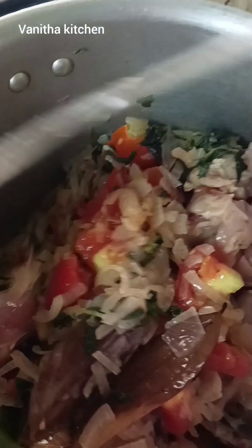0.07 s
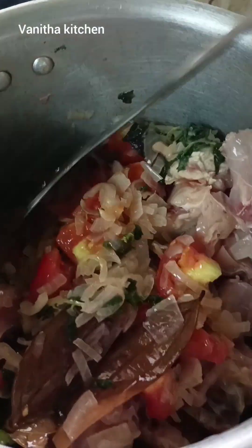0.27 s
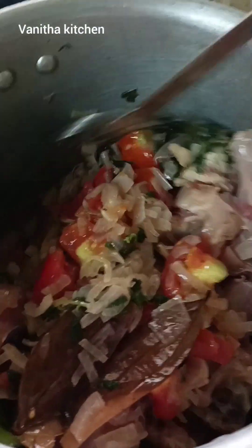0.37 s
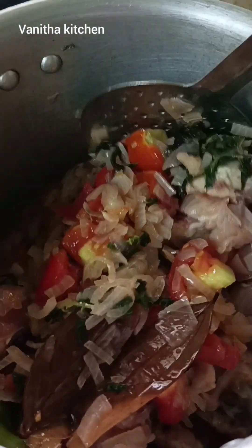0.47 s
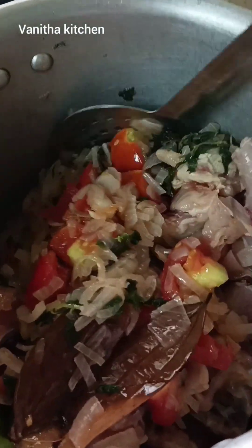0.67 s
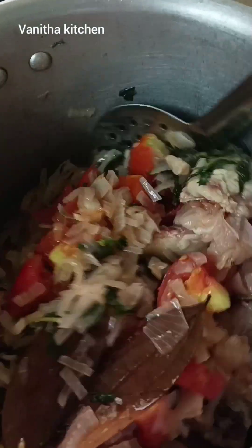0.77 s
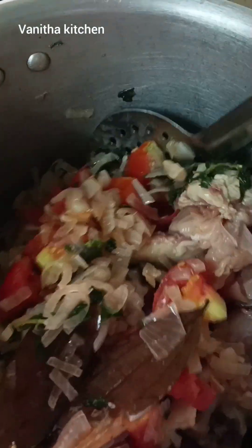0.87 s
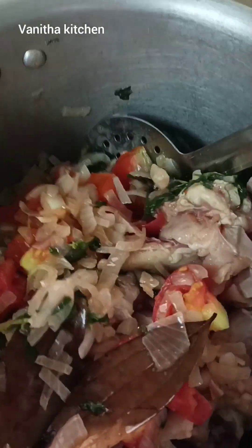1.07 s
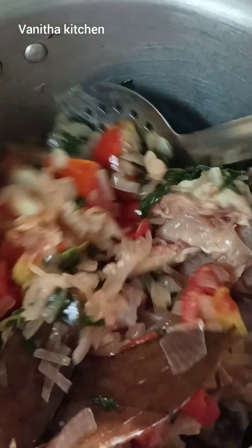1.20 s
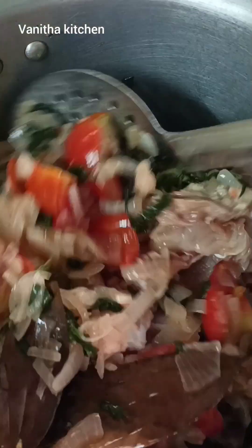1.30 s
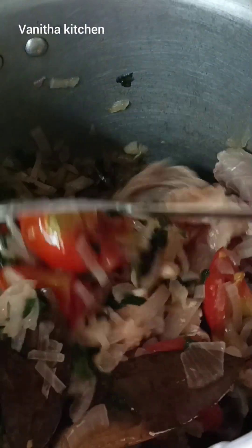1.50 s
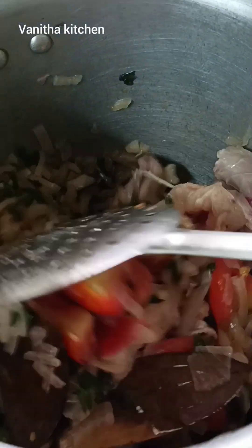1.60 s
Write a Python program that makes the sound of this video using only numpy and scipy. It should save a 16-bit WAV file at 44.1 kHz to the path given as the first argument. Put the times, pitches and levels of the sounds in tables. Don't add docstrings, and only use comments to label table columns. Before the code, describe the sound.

After a brief quiet moment, bright spoon knocks ring on a cooking pot, followed by gritty scrapes down the wall, a lull, and softer muffled rubbing along the base, heard close in stereo over low kitchen noise.

```python
import sys
import numpy as np
from scipy import signal
from scipy.fft import rfft, irfft
from scipy.io import wavfile
from scipy.ndimage import uniform_filter1d

SR = 44100
rng = np.random.default_rng(int(sys.argv[2]) if len(sys.argv) > 2 else 0)


def wrap_up_sound(samples):
    columns = np.atleast_2d(samples).T
    tamed = np.clip(columns, -1, 1)
    steps = np.round(tamed * 32767).astype(np.int16)
    wavfile.write(sys.argv[1], SR, steps)


def linear_from_db(decibels):
    return 10 ** (np.asarray(decibels, float) / 20)


N = 72765
LAG_S = 0.0008


def evened(x):
    return x / np.sqrt(np.mean(x ** 2) + 1e-20)


def read(points, hz):
    f, value = np.transpose(points)
    return np.interp(np.log(hz + 1), np.log(f + 1), value)


def colour(x, points, share):
    hz = np.fft.rfftfreq(len(x), 1 / SR)
    return irfft(rfft(x) * linear_from_db(share * read(points, hz)), len(x))


def resonate(x, hz, width):
    turn = np.exp(2j * np.pi * np.cumsum(hz * np.ones(x.shape[-1])) / SR)
    decay = np.exp(-np.pi * width / SR)
    return 2 * (turn * signal.lfilter([1 - decay], [1, -decay], x / turn)).real


# frequency in Hz, level in dB per Hz.
HISS = [(55, -25), (130, -2.5), (440, -8.5), (800, -14.5), (3000, -22), (12000, -28.5), (15700, -29),
        (16100, -58)]
# frequency in Hz, correlation (1 = same).
HISS_ALIKE = [(60, 1), (600, 0.09), (3000, 0.067), (15000, 0.13)]
# frequency in Hz, left minus right in dB.
HISS_SIDES = [(60, -3), (180, 3), (550, 6.5), (1650, 11.5), (4970, 1), (15000, -3.5)]


def kitchen_hiss():
    level_db, patch_db = -51.5, -1.5
    hz = np.fft.rfftfreq(1024, 1 / SR)
    a, b, c, d, patches = rng.standard_normal((N // 256 + 5, len(hz), 5)).T
    patches = uniform_filter1d(patches, size=10, axis=0)
    patches = evened(uniform_filter1d(patches, size=10, axis=1))
    alike = read(HISS_ALIKE, hz)[:, None]
    side = linear_from_db(read(HISS_SIDES, hz) / 2)[:, None]
    left = a + 1j * b
    right = alike * left + np.sqrt(1 - alike ** 2) * (c + 1j * d)
    spectrum = np.array([side * left, right / side])
    spectrum *= linear_from_db(read(HISS, hz)[:, None] + patch_db * patches)
    hiss = signal.istft(spectrum, nperseg=1024, noverlap=768)[1][:, :N]
    return linear_from_db(level_db) * evened(hiss)


# frequency in Hz, level in dB.
TONES = [(441.4, -63), (589, -70), (2013, -73), (6681, -82), (8554, -82), (10616, -86), (14858, -79),
         (15057, -75)]
# time in seconds, level in dB.
HUM = [(0, -65), (.25, -63), (.32, -113), (1.25, -65), (1.38, -59.5), (1.65, -59)]


def appliances():
    hum_hz, whine_hz, whine_width_hz, whine_db = 69.7, 15000, 400, -73
    t = np.arange(N) / SR
    tones = np.zeros(N)
    for hz, db in TONES:
        waver = 1 + 0.32 * evened(uniform_filter1d(rng.standard_normal(N), size=2000))
        tones += np.sqrt(2) * linear_from_db(db + 2) * waver * np.sin(2 * np.pi * (hz * t + rng.random()))
    hum = np.sqrt(2) * linear_from_db(np.interp(t, *np.transpose(HUM))) * np.sin(2 * np.pi * hum_hz * t)
    whine = resonate(rng.standard_normal((2, N)), whine_hz, whine_width_hz)
    whine = resonate(whine, whine_hz, whine_width_hz)
    return tones + hum * linear_from_db([[1.5], [-1.5]]) + linear_from_db(whine_db) * evened(whine)


def room(x):
    level_db, t60_s = -17, 0.15
    t = np.arange(SR // 2) / SR
    tail = rng.standard_normal((2, len(t))) * linear_from_db(-60 * t / t60_s) * (t > 0.005)
    tail /= np.linalg.norm(tail[0])
    return linear_from_db(level_db) * signal.fftconvolve(x, tail, axes=1)[:, :N]


# frequency in Hz, left minus right in dB.
POT_SIDES = [(100, 2), (350, -2), (650, 3), (1300, 7), (2500, 3), (5000, 4), (9000, 8), (15000, 4)]


def ports(a, b):
    alike, pad = 0.13, np.zeros(256)
    right = alike * a + np.sqrt(1 - alike * alike) * b
    sides = [colour(np.r_[pad, a], POT_SIDES, 0.5), colour(np.r_[pad, right], POT_SIDES, -0.5)]
    return np.array(sides)[:, len(pad):] / np.sqrt(len(a))


def ring(modes, bed, bed_db, t60):
    damping = 0.0061
    port_turn, port_spread = 0.2, 0.14
    t = np.arange(8192) / SR
    hz, width, db = np.transpose(modes)[:, :, None]
    width = width + damping * hz
    first, spread = rng.random((2, len(modes), 1))
    second = first + port_turn + port_spread * spread - hz * LAG_S
    waves = np.sin(2 * np.pi * (hz * t + np.array([first, second])))
    clear = (linear_from_db(db) * width * np.exp(-np.pi * width * t) * waves).sum(axis=1)
    dense = np.array([colour(noise, bed, 0.82) for noise in rng.standard_normal((2, len(t)))])
    dense *= linear_from_db(-60 * t / t60)
    return ports(*(evened(clear) + linear_from_db(bed_db) * evened(dense)))


def crack(bed):
    level_db, tilt_db_per_octave, port_shift_s, size = 5.5, 6, 0.0006, 8192
    hz = np.fft.rfftfreq(size, 1 / SR)
    tilt = tilt_db_per_octave * np.log2(1 + hz / 1000)
    cepstrum = irfft(np.log(linear_from_db(read(bed, hz) + tilt)))
    fold = np.r_[1, 2 * np.ones(size // 2 - 1), 1, np.zeros(size // 2 - 1)]
    click = evened(irfft(np.exp(rfft(cepstrum * fold))))
    return linear_from_db(level_db) * ports(click, np.roll(click, round(port_shift_s * SR)))


# start in seconds, length in seconds, first pressure in dB,
# last pressure in dB, extra weight on low modes in dB.
STROKES = [(0.202, 0.048, -25.5, -34.5, 4.5), (0.243, 0.065, -46.5, -57.5, 14),
           (0.319, 0.022, -34, -29.5, 13.5), (0.337, 0.019, -31.5, -28.5, 10), (0.365, 0.053, -39, -42, 9),
           (0.427, 0.04, -25, -33, 3), (0.474, 0.0284, -40, -41.5, 12.5), (0.52, 0.092, -53, -46, -37),
           (0.635, 0.067, -31.5, -54.5, 6), (0.704, 0.064, -58, -54, 9.5), (0.754, 0.035, -43.5, -37.5, 2),
           (0.795, 0.041, -36, -41.5, 6), (0.838, 0.032, -65, -62, 14), (0.904, 0.029, -54, -66, 0),
           (1.004, 0.045, -60.5, -64.5, 14.5), (1.166, 0.032, -40, -40.5, 3.5),
           (1.199, 0.055, -41.5, -30.5, 10), (1.261, 0.033, -35.5, -30, 10),
           (1.292, 0.057, -40.5, -62, 14.5), (1.36, 0.041, -37, -47.5, 17.5), (1.4, 0.02, -55, -52.5, 13)]


def scrape():
    slips_per_s, spread_db, split_hz, edge_s = 9000, 2.5, 1070, 0.0019
    t = np.arange(N) / SR
    size = linear_from_db(spread_db * np.minimum(rng.exponential(1, N), 4))
    slips = rng.random(N) < slips_per_s / SR
    grit = evened(size * slips * rng.standard_normal(N))
    low = signal.sosfilt(signal.butter(2, split_hz, fs=SR, output="sos"), grit)
    high = signal.sosfilt(signal.butter(2, split_hz, "high", fs=SR, output="sos"), grit)
    out = np.zeros(N)
    for start, length, first_db, last_db, low_db in STROKES:
        end = start + length
        touch = np.clip(np.minimum(t - start, end - t) / edge_s + 0.5, 0, 1)
        pressure = linear_from_db(np.interp(t, [start, end], [first_db, last_db]))
        out += touch * pressure * (high + linear_from_db(low_db) * low)
    return out


# time in seconds, frequency in Hz.
SQUEAK = [(.75, 1080), (.85, 989.6), (.98, 880), (1.05, 897)]


def squeak(slips, zone):
    level_db, width_hz = 27, 30
    pitch = np.interp(np.arange(N) / SR, *np.transpose(SQUEAK))
    tone = resonate(slips * ((zone == 4) | (zone == 5)), pitch, width_hz)
    return linear_from_db(level_db) * tone * linear_from_db([[4], [-4]])


# time in seconds, peak in dB, colour centre in Hz, colour level in dB,
# push on the ring in dB.
KNOCKS = [(0.198, -14, 2590, -8, 6), (0.1995, -13.5, 3400, 0.5, 10), (0.2068, -24.5, 1600, 21.5, 0.5),
          (0.2178, -20.5, 5100, -0.5, 8.5), (0.3132, -11, 10400, 19, 3), (0.3155, -15, 3600, 6, 1.5),
          (0.3188, -27, 10400, 28.5, 4.5), (0.3203, -9.5, 5500, -23, 5.5), (0.3248, -19, 3480, -4, 6.5),
          (0.3856, -39, 2030, 21, 9), (0.4303, -22.5, 3760, 1.5, 12.5), (0.444, -37, 4630, 8, 19),
          (0.464, -39, 2080, 21, 12), (0.5389, -50.5, 4460, 20.5, 10.5), (0.552, -46.5, 2920, 17, 16),
          (0.6368, -19, 4420, -32, 6.5), (0.8912, -17.5, 3370, -8.5, 11), (1.167, -49, 4400, 16, -12),
          (1.1799, -50, 3250, 3, -1), (1.221, -47, 800, 21, 4), (1.2462, -26, 900, -10, -2),
          (1.268, -33, 3150, 15, 7.5), (1.2800, -24, 1670, 3, 8), (1.358, -39.5, 3400, 2, 12),
          (1.371, -39, 600, 18, 11), ]


def knocks():
    onset_s, chatter_s, chatter_db, contact_db = 0.003, 0.002, -3, 7
    t = np.arange(1024) / SR
    out = np.zeros((2, N))
    envelope = np.minimum(t / onset_s, 1) ** 4 * np.exp(-np.maximum(t - onset_s, 0) / chatter_s)
    chatter = linear_from_db(chatter_db) * envelope * rng.standard_normal((30, len(t)))
    for (s, db, hz, colour_db, ring_db), burst in zip(KNOCKS, chatter):
        burst[round(onset_s * SR)] += linear_from_db(contact_db)
        width = 0.25 * hz
        tint = resonate(resonate(burst, hz, width), hz, width)
        burst = burst + linear_from_db(colour_db) * tint
        at = round((s - onset_s + 0.001) * SR)
        out[:, at:at + len(t)] += linear_from_db(db - 8.5) * burst * linear_from_db([[ring_db], [0]])
    return out


# frequency in Hz, width in Hz, level in dB.
RIM = [(390.5, 33, 1.5), (645, 9.9, 1), (1035, 60, -4.5), (1220, 74, 3.5), (1611, 29, 6), (2010, 190, 1.5),
       (2320, 100, -5), (2490, 39, -12), (3450, 73, -4.5), (3630, 50, -9), (4720, 110, -6),
       (6870, 660, -13)]
# frequency in Hz, width in Hz, level in dB.
WALL = [(386.7, 19, 3.5), (1300, 50, -0.5), (1870, 12, 7), (2076, 58, 5), (2240, 24, 4.5), (2510, 45, 3),
        (2955, 53, 2.5), (3280, 62, 4.5), (3610, 49, 0), (3785, 55, 2), (4654, 69, 2), (5500, 260, -0.5),
        (6430, 95, -1.5), (10400, 140, -17.5)]
# frequency in Hz, width in Hz, level in dB.
SLOPE = [(394, 22, -12), (710, 34, -38), (1279, 30, -0.5), (1973, 34, 5.5), (1986, 35, -6.5),
         (2232, 40, -5), (3160, 130, -9), (3400, 67, -32), (3720, 42, -4), (4260, 140, -15),
         (4620, 88, -10.5), (5600, 190, -15), (6700, 71, -25)]
# frequency in Hz, width in Hz, level in dB.
LOWER = [(381, 32, -7), (1074, 17, -8), (1360, 20, -3), (1930, 34, 1.5), (2214, 26, -5.5), (3008, 52, -1),
         (3340, 57, -7.5), (4340, 24, -10), (5440, 68, -6.5), (6540, 100, -15.5)]
# frequency in Hz, width in Hz, level in dB.
DEEP = [(419, 17, -13.5), (2190, 170, -6.5), (3060, 100, -11), (3330, 48, -6), (3580, 51, -2.5),
        (3560, 77, -1), (4350, 270, -16), (4600, 75, -11), (5650, 68, -17), (6070, 91, -21)]
# frequency in Hz, width in Hz, level in dB.
CORNER = [(670, 24, -6), (930, 74, -7), (1310, 23, 2.5), (2350, 73, -7), (2840, 60, 3), (3020, 160, 4.5),
          (3375, 160, 0), (3680, 36, -31), (4560, 140, -6), (5710, 170, 0), (7100, 310, -39)]
# frequency in Hz, width in Hz, level in dB.
BASE = [(378, 124, -6.5), (487, 90, -7.5), (654.7, 19.4, 1), (818, 106, -5), (940, 25, -4.5),
        (1277, 20, -2), (1720, 28, 4), (2400, 190, 0.5), (3200, 106, 4.5), (3600, 160, -8),
        (4460, 170, -13), (5870, 220, -18.5)]
# frequency in Hz, width in Hz, level in dB.
FOOD = [(315, 90, -9.5), (510, 71, -6), (590, 44, -0.5), (1530, 33, -10), (1804, 69, -8.5), (2740, 200, 3),
        (3400, 93, 2.5)]
# frequency in Hz, level in dB per Hz.
RIM_BED = [(200, 5), (500, -16.5), (1200, 2), (2300, 11.5), (4500, -2), (9000, -12), (15500, -30),
           (17000, -36)]
# frequency in Hz, level in dB per Hz.
WALL_BED = [(200, -40), (400, -44), (800, -2), (3000, 14.5), (6000, -5.5), (10000, -23), (15500, -18),
            (17000, -23)]
# frequency in Hz, level in dB per Hz.
SLOPE_BED = [(200, -45), (700, -15), (2000, 2.5), (4000, 1), (6000, -9), (9000, -11), (15500, -34),
             (17000, -66)]
# frequency in Hz, level in dB per Hz.
DEEP_BED = [(200, -24), (800, 5.5), (1600, -5), (3200, 3), (4800, -2.5), (7000, -10.5), (15500, -44),
            (17000, -65)]
# frequency in Hz, level in dB per Hz.
BASE_BED = [(120, 0), (300, -13.5), (700, -37), (1500, -3.5), (3300, -5), (8000, -16.5), (16000, -69)]
ZONE_ENDS_S = [
    .311,
    .424,
    .63,
    .745,
    .886,
    1.1,
    1.345,
    1.7,
]
BED_DB = (-3.5, -4, -10.5, -9.5, -13.5, -12.5, -6, -13.5)
BED_T60_S = (0.052, 0.073, 0.09, 0.032, 0.16, 0.064, 0.027, 0.044)
ZONE_PAN_DB = (-2, 1, 0.5, 2, -2.5, 3.5, 2, -1)


def pot():
    rumble_hz = 215
    zone = np.searchsorted(ZONE_ENDS_S, np.arange(N) / SR)
    blow, crack_push = knocks()
    slips = scrape()
    modes = (RIM, WALL, SLOPE, LOWER, DEEP, CORNER, BASE, FOOD)
    beds = (RIM_BED, WALL_BED, SLOPE_BED, SLOPE_BED, DEEP_BED, DEEP_BED, BASE_BED, BASE_BED)
    out = squeak(slips, zone)
    for k, (mode, bed) in enumerate(zip(modes, beds)):
        pan = linear_from_db([[ZONE_PAN_DB[k] / 2], [-ZONE_PAN_DB[k] / 2]])
        answers = ring(mode, bed, BED_DB[k], BED_T60_S[k]), crack(bed)
        for push, answer in zip((blow + slips, crack_push), answers):
            touched = push * (zone == k)
            out += signal.fftconvolve(touched[None], answer * pan, axes=1)[:, :N]
    return signal.sosfilt(signal.butter(4, rumble_hz, "high", fs=SR, output="sos"), out)


def scene():
    sheen_hz, sheen_width_hz, sheen_db = 15400, 980, 4
    metal = pot()
    metal = metal + linear_from_db(sheen_db) * resonate(metal, sheen_hz, sheen_width_hz)
    return metal + room(metal) + kitchen_hiss() + appliances()


def top_cut(x):
    return signal.sosfilt(signal.butter(12, 17060, fs=SR, output="sos"), x)


def record(dry):
    edge_hz, leak_db = 15850, -24
    lag = round(LAG_S * SR)
    left = np.r_[dry[0, :lag][::-1], dry[0, :N - lag]]
    late = np.array([left, dry[1]])
    cut = signal.oaconvolve(late, signal.firwin(255, edge_hz, fs=SR)[None], "same")
    mix = cut + linear_from_db(leak_db) * (late - cut)
    return top_cut(mix)


dry = scene()
out = record(dry)
wrap_up_sound(out)
```